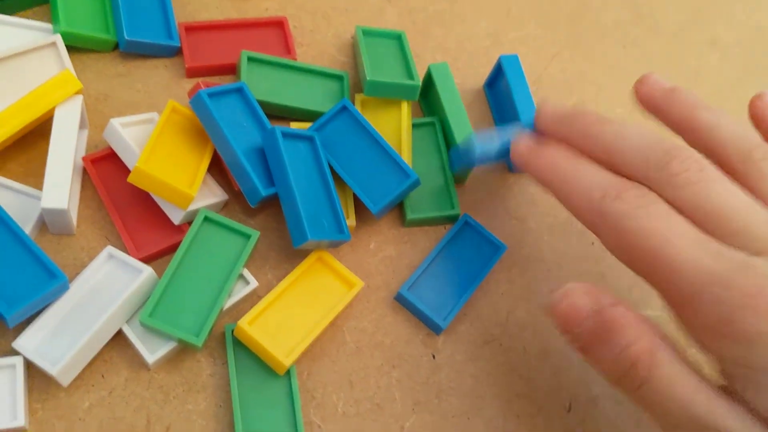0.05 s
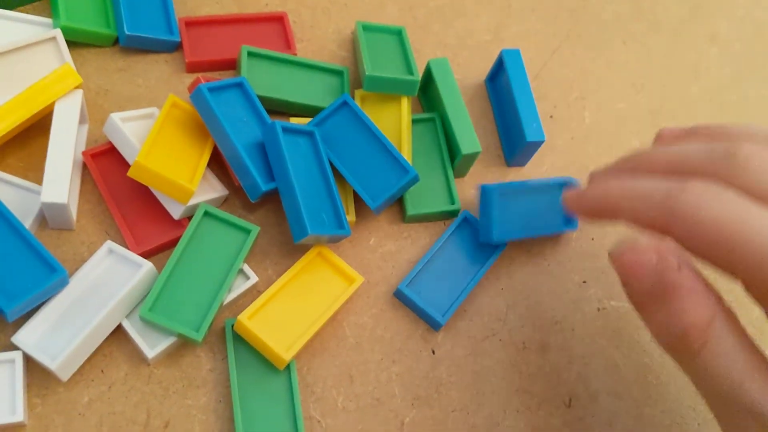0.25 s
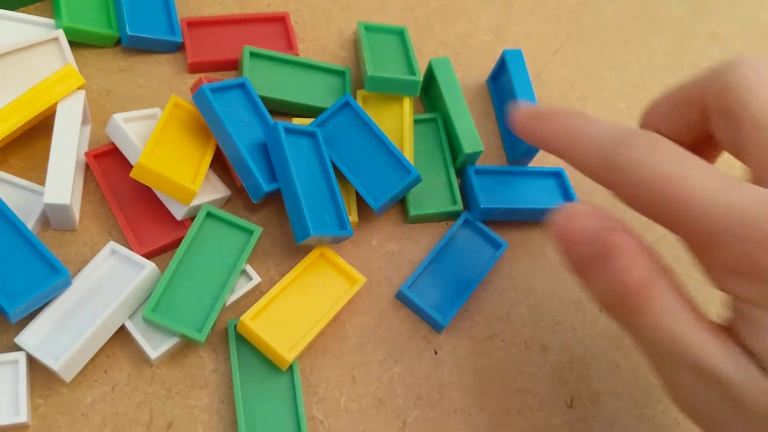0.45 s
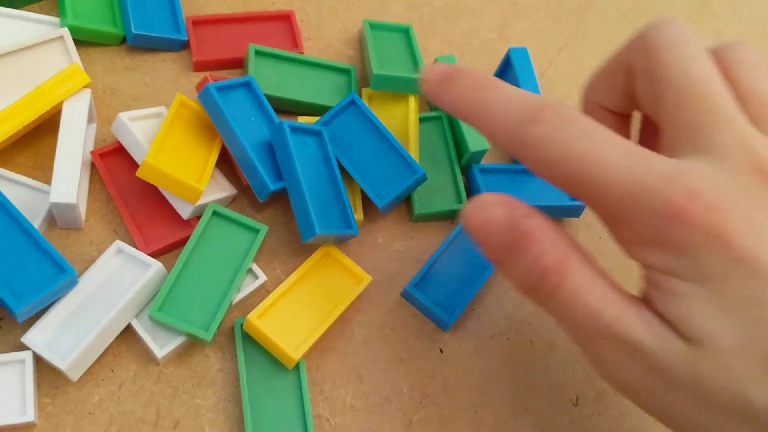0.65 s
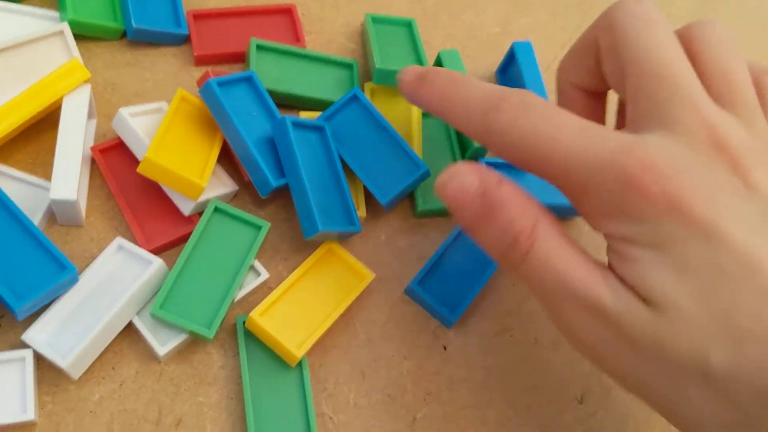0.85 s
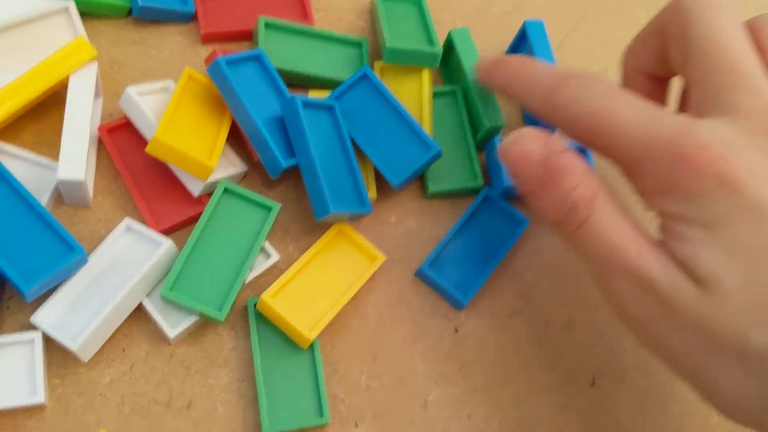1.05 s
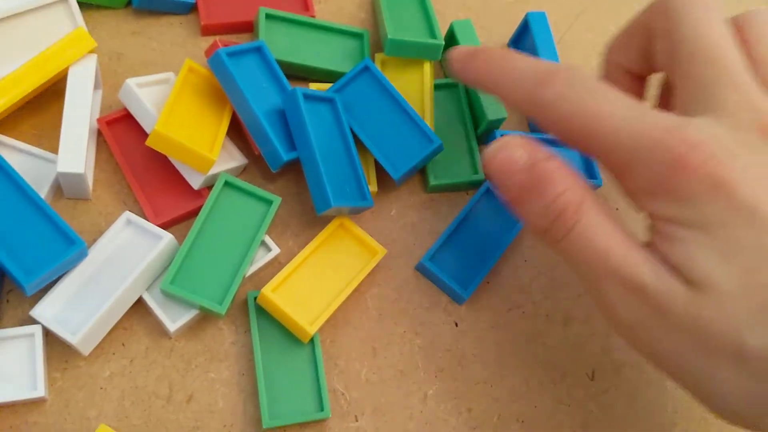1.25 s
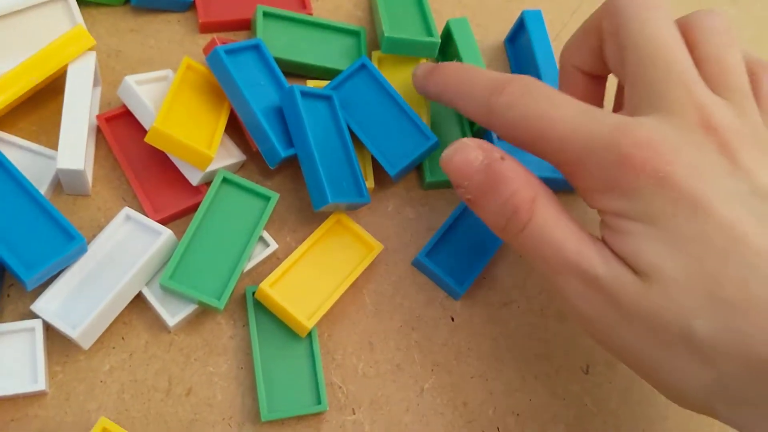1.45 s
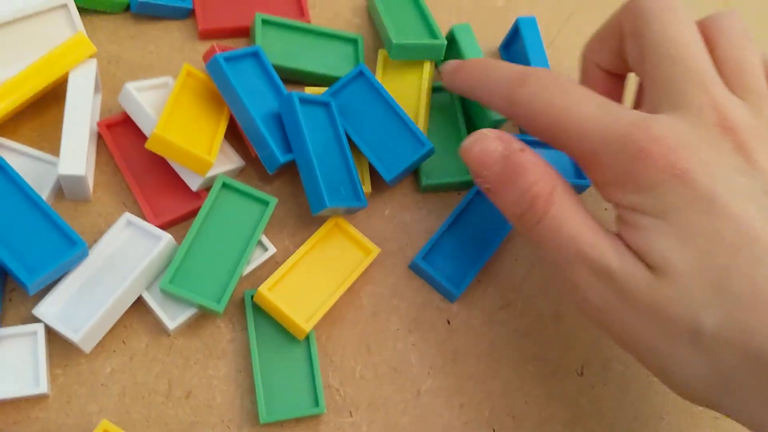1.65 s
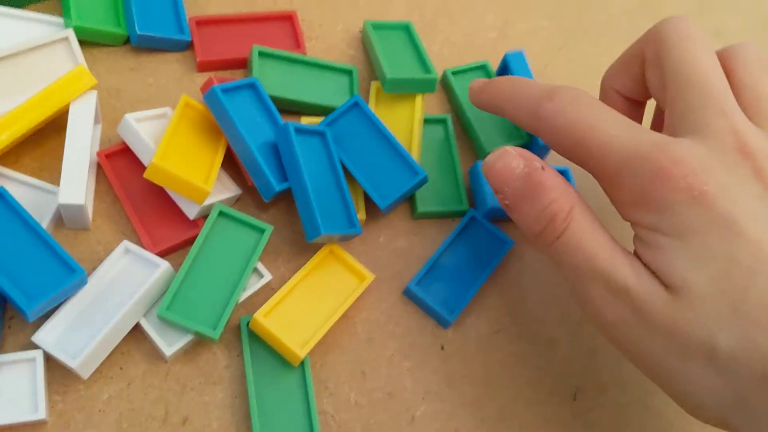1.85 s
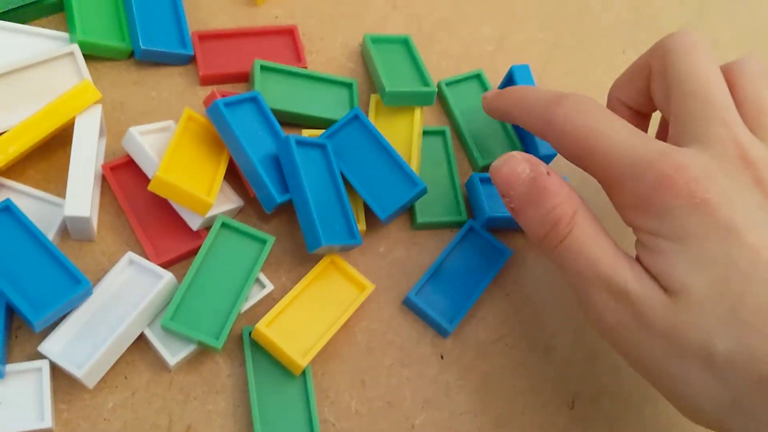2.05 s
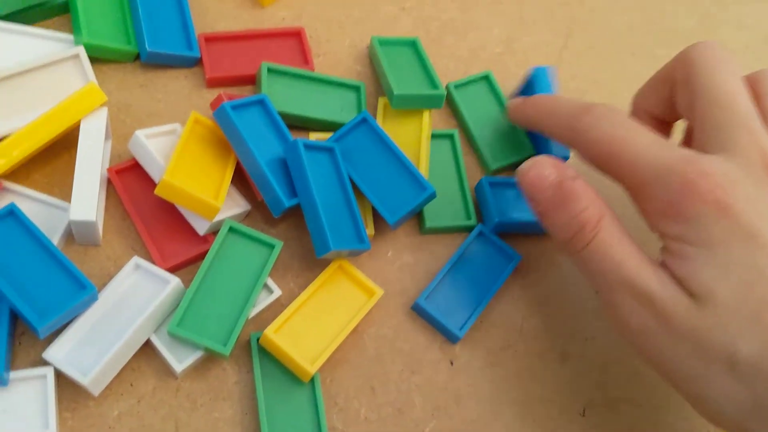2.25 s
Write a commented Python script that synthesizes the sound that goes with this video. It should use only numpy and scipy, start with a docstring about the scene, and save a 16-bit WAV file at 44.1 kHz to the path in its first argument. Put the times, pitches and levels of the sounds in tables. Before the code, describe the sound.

Two quick, light clatters of hollow plastic dominoes falling on a board.

```python
"""A finger tips small hollow plastic dominoes over on a board, close up, in a small live room.
Over a low rumble and faint hiss, a piece slides softly, then the first domino clatters down at 0.2 s:
each contact is a short crack of the shell, a ring of its few modes and a knock of the tabletop.
Two faint nudges tick in the lull. From 1.6 s the pieces slide and nudge each other again,
and the second domino falls between 1.8 and 2 s, with a ring of its own."""
import sys
import numpy as np
from scipy import signal
from scipy.fft import rfft, irfft
from scipy.io import wavfile

SR = 44100
rng = np.random.default_rng(int(sys.argv[2]) if len(sys.argv) > 2 else 0)


def int16_out(signal):
    """Quantize to a 16-bit WAV file."""
    q = np.round(np.clip(np.atleast_2d(signal).T, -1, 1) * 32767)
    wavfile.write(sys.argv[1], SR, q.astype(np.int16))


N = 101429

# Tone of the room hiss and of the rumble (frequency [Hz], level [dB])
HISS_SPECTRUM = [(20, -14.5), (100, -3), (140, 2.5), (230, 4), (400, -4), (700, -7), (950, -4.5),
                 (1250, -13.5), (2200, -14.5), (4500, -12), (8000, -14.5), (16000, -24)]
RUMBLE_SPECTRUM = [(10, -26.5), (22, -9), (45, 2.5), (58, -10), (72, -10.5), (95, -23), (200, -44.5),
                   (1000, -79.5)]
# Swells in the low end (time [s], level [dB])
RUMBLE_SWELLS = [(0.05, -58.5), (0.53, -59), (1.001, -62.5), (1.16, -60.5), (1.62, -59)]
# Decay of the room tail (frequency [Hz], t60 [s])
ROOM_DECAY = [(150, .30), (600, .37), (2000, .40), (4800, .385), (8000, .37), (15000, .33)]
# Pieces pushed over the board (start [s], length [s], level [dB])
PUSHES = [(-0.03, 0.25, -67.5), (0.182, 0.0088, -55), (1.579, 0.16, -69), (1.731, 0.068, -59.5)]
# Tone of the slide, the tabletop knock and the shell crack (frequency [Hz], level [dB])
SLIDE_SPECTRUM = [(60, -19.5), (200, 0.5), (380, 2), (560, 1.5), (800, -4), (1600, -5), (2100, -11),
                  (3000, -7.5), (5000, -14), (9000, -24), (16000, -32)]
KNOCK_SPECTRUM = [(60, -32.5), (100, -24), (145, -2), (220, 5), (400, -7.5), (580, -2.5), (800, -6.5),
                  (1100, -6), (1550, -2), (2050, -14.5), (4000, -17.5), (12000, -49.5)]
CRACK_SPECTRUM = [(300, -28), (2000, -20), (2500, -9), (3000, -2), (4200, 0.5), (5600, 0), (6800, -9.5),
                  (8000, -1.5), (8600, -11), (9600, -5.5), (11200, -2), (12400, -10), (14200, -5),
                  (16000, -11)]
# Resonances of the tabletop and of each domino (frequency [Hz], level [dB], t60 [s])
TABLETOP_MODES = [(153, -4.5, 0.21), (204.2, 4, 0.11), (228, -1, 0.04), (287, -5.5, 0.15),
                  (479.7, -3.5, 0.1), (600, -7.5, 0.045)]
FIRST_DOMINO_MODES = [(5022, -0.5, 0.046), (5066, -3, .13), (5120, -4, .06), (7710, -4, .07),
                      (7660, -4.5, 0.053), (9500, -11, 0.044), (10580, -9, 0.033), (10950, -3.5, .05),
                      (14010, -13, .03)]
SECOND_DOMINO_MODES = [(5122, 3, 0.023), (5072, -5, 0.1), (5180, -11, 0.038), (7580, -2, 0.085),
                       (7680, -4, 0.092), (10330, -16, 0.096), (13600, -9, 0.017)]
# Domino contacts (time [s], crack [dB], ring [dB], tabletop [dB], brightness [Hz], upper-mode gain [dB])
HITS = [ (0.2081, -7.5, -9, -17.5, 14000, 29), (0.2125, -8.5, -19, -42, 11000, 5),
        (0.2255, -3, -11, -14.5, 4800, -1.5), (0.2282, 4, 3, -17, 16000, 8.5),
        (0.2308, -3, -25, -18.5, 9000, -7), (0.2398, 0, 7, -12, 8500, -29),
        (0.2450, -21, 0, -24, 9200, -5.5), (0.2645, -9, -0.5, -26, 7000, -22),
        (0.2720, -10, -10, -31, 12000, -17), (0.2855, -19, -19, -20.5, 6000, 2),
        (0.3065, -23, -26, -29.5, 7000, -17), (0.3135, -22, -20, -28.5, 7000, 1),
        (0.3850, -2, 1, -15.5, 7700, -10), (0.3910, -3, 0.5, -26, 14400, 0),
        (0.4030, -29, -1.5, -28, 9000, -11), (0.4235, -14.5, -15.5, -25.5, 7500, -12),
        (0.4480, -29, -4.5, -27, 7020, -19), (0.4590, -32, -11, -37.5, 7050, -11),
        (0.8340, -44, -56, -44, 4494, -6), (1.087, -47.5, -55.5, -50, 4500, -8.5),
        (1.5981, -37, -40, -43.5, 5400, -12), (1.6270, -39.5, -42, -36, 6100, -11),
        (1.682, -47, -45, -43.5, 4550, -10), (1.8000, -21.5, -36, -32, 4250, -14),
        (1.806, -16, -23.5, -21, 5300, -7), (1.812, -21, -16, -23, 7000, -7),
        (1.9058, -19, -10.5, -40, 4500, -36), (1.9147, -16, -11.5, -29, 4000, -21),
        (1.934, -7, -13, -20.5, 4750, -12), (1.9380, -17, -6.5, -21.5, 12000, 2),
        (1.9490, -36, -4, -30.5, 9100, -5.5), (1.9830, -9.5, -18, -25.5, 8000, 6),
        (1.9960, -13, -1.5, -29, 8000, -13.5), (2.0080, -20.5, -7, -36.5, 5400, -7.5)]

HISS_DB, RUMBLE_DB, HUM_HZ, HUM_DB = -69.5, -64, 48, -68
SWELL_HZ, SWELL_WIDTH_S = 71, 0.046
TAIL_DB, EARLY_DB, EARLY_T60_S, ROOM_DELAY_S, BOARD_SEND_DB = -6.5, -4, 0.18, 0.003, -3
KNOCK_T60_S, BOOM_DB, BOARD_LEFT_DB = 0.021, -1.5, 0.5
BOARD_LOW_HZ = 123.4  # the board sounds are cut below this
CRACK_RISE_S, CRACK_T60_S, RING_RISE_S = 0.00067, 0.024, 0.0004
UPPER_FROM_HZ, SECOND_FROM_S = 6500, 1.5
NARROW_BELOW_HZ, TOP_HZ = 520, 15900


def undb(db):
    """Decibels to gain."""
    return 10 ** (np.asarray(db) / 20)


def unit(x):
    """Scale to an average energy of 1 per channel."""
    return x / np.sqrt(np.mean(np.sum(x ** 2, axis=-1)))


def fade(t, t60):
    """Exponential decay, 60 dB down at t60."""
    return np.exp(-np.log(1000) * t / t60)


def curve(points, hz):
    """Read (frequency [Hz], value) points on a log-frequency axis."""
    p = np.array(points, float)
    return np.interp(np.log(hz + 1), np.log(p[:, 0]), p[:, 1])


def colour(x, points):
    """EQ steady noise and scale it to rms 1."""
    y = irfft(rfft(x) * undb(curve(points, np.fft.rfftfreq(N, 1 / SR))), N)
    return y / y.std()


def causal_eq(x, gain):
    """Minimum-phase EQ with a gain per bin: nothing rings ahead of the attack."""
    cepstrum = irfft(np.log(gain + 1e-6))
    half = len(cepstrum) // 2
    cepstrum[1:half] *= 2
    cepstrum[half + 1:] = 0
    return irfft(rfft(x) * np.exp(rfft(cepstrum)))


def stereo_noise(size, width):
    """White noise; width is the side-to-mid ratio."""
    mid, side = rng.standard_normal((2, size))
    return np.array([mid + width * side, mid - width * side]) / np.hypot(1, width)


def narrow_bass(x):
    """Long waves reach two close microphone ports alike, so the bass narrows toward mono."""
    hz = np.fft.rfftfreq(N, 1 / SR)
    mid = x.mean(axis=0)
    return mid + irfft(rfft(x - mid) * hz / np.hypot(hz, NARROW_BELOW_HZ), N)


def room_tone():
    """The bed: faint room hiss and a low rumble that hums and swells now and then."""
    t = np.arange(N) / SR
    hum = np.sqrt(2) * np.sin(2 * np.pi * (HUM_HZ * t + rng.random()))
    swells = 0
    for at, db in RUMBLE_SWELLS:
        tone = np.sqrt(2) * np.sin(2 * np.pi * (SWELL_HZ * t + rng.random()))
        swells += undb(db) * np.exp(-((t - at) / SWELL_WIDTH_S) ** 2) * tone
    hiss = colour(narrow_bass(stereo_noise(N, width=1)), HISS_SPECTRUM)
    rumble = colour(stereo_noise(N, width=0.099), RUMBLE_SPECTRUM)
    return undb(HISS_DB) * hiss + undb(RUMBLE_DB) * rumble + undb(HUM_DB) * hum + swells


def room_reverb(x, size=32768):
    """Wet signal only: sparse early reflections off the table and near things, and a diffuse tail."""
    t, hz = np.arange(size) / SR, np.fft.rfftfreq(size, 1 / SR)
    spectrum, tail = rfft(stereo_noise(size, width=0.59)), 0
    for band_hz, t60 in ROOM_DECAY:
        band = curve([(f, f == band_hz) for f, _ in ROOM_DECAY], hz)
        tail += irfft(spectrum * band) * fade(t, t60)
    early = stereo_noise(size, width=1) * (rng.random((2, size)) < 0.03) * fade(t, EARLY_T60_S)
    arrived = t > ROOM_DELAY_S
    response = undb(TAIL_DB) * unit(tail * arrived) + undb(EARLY_DB) * unit(early * arrived)
    return signal.fftconvolve(x, response, axes=1)[:, :N]


def sliding():
    """Plastic catches and slips on the board in short, grainy pushes."""
    t = np.arange(N) / SR
    envelope = 0
    for start, length, db in PUSHES:
        progress = np.clip((t - start) / length, 0, 1)
        envelope += undb(db) * np.sqrt(np.abs(np.sin(np.pi * progress)))
    catches = np.exp(0.3 * np.repeat(rng.standard_normal(N), 64)[:N])  # a new gain every 64 samples
    return envelope * colour(stereo_noise(N, width=0.79) * catches, SLIDE_SPECTRUM)


def tabletop_knock(t, hz):
    """The struck board gives a dull knock and a boom of low modes, slightly detuned on each hit."""
    burst = stereo_noise(len(t), width=0.4) * fade(t, KNOCK_T60_S)
    knock = causal_eq(burst, undb(curve(KNOCK_SPECTRUM, hz)))
    boom = 0
    for f, db, t60 in TABLETOP_MODES:
        detune = 1 + 0.03 * rng.standard_normal()
        boom += undb(db) * fade(t, t60) * np.sin(2 * np.pi * f * detune * t)
    return unit(knock) + undb(BOOM_DB) * unit(boom)


def shell_crack(t, hz, bright_hz):
    """The snap of the plastic shell; a softer, longer contact leaves the treble out."""
    burst = stereo_noise(len(t), width=1.1) * fade(t, CRACK_T60_S) * (1 - np.exp(-t / CRACK_RISE_S))
    rolloff = 1 / np.sqrt(1 + (hz / bright_hz) ** 6)
    return unit(causal_eq(burst, undb(curve(CRACK_SPECTRUM, hz)) * rolloff))


def shell_ring(t, modes, upper_db):
    """The hollow domino rings; the struck spot sets the share of its upper modes."""
    ring = 0
    for f, db, t60 in modes:
        # each mode reaches left and right in a different phase
        phase = rng.uniform(0, 2 * np.pi) + rng.choice([-1, 1]) * np.array([[0.8], [-0.8]])
        gain = undb(db + upper_db * (f > UPPER_FROM_HZ))
        ring += gain * fade(t, t60) * np.sin(2 * np.pi * f * t + phase)
    return unit(ring * (1 - np.exp(-t / RING_RISE_S)))


def dominoes(size=16384):
    """Every contact cracks and rings the shell and knocks the board; returns plastic and board stems."""
    t, hz = np.arange(size) / SR, np.fft.rfftfreq(size, 1 / SR)
    plastic, board = np.zeros((2, 2, N + size))
    for start, crack_db, ring_db, table_db, bright_hz, upper_db in HITS:
        modes = FIRST_DOMINO_MODES if start < SECOND_FROM_S else SECOND_DOMINO_MODES
        i = int(start * SR)
        plastic[:, i:i + size] += undb(crack_db) * shell_crack(t, hz, bright_hz)
        plastic[:, i:i + size] += undb(ring_db) * shell_ring(t, modes, upper_db)
        board[:, i:i + size] += undb(table_db) * tabletop_knock(t, hz)
    low_cut = signal.butter(6, BOARD_LOW_HZ, "high", fs=SR, output="sos")
    return plastic[:, :N], signal.sosfilt(low_cut, board[:, :N])


def scene():
    """The mix: wide plastic and a narrower, drier board share one room, over the room tone."""
    plastic, board = dominoes()
    board = board + sliding()
    board = narrow_bass(board + undb(BOARD_SEND_DB) * room_reverb(board))
    pan = undb(np.array([[BOARD_LEFT_DB], [-BOARD_LEFT_DB]]) / 2)
    return plastic + room_reverb(plastic) + board * pan + room_tone()


def record(dry):
    """A steep low-pass takes off the very top."""
    return signal.sosfilt(signal.ellip(10, 0.2, 80, TOP_HZ, fs=SR, output="sos"), dry)


dry = scene()
out = record(dry)
int16_out(out)
```